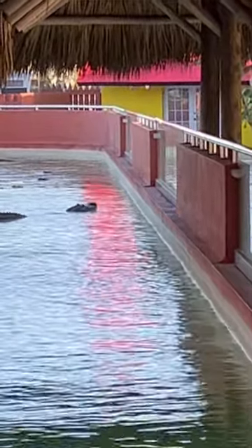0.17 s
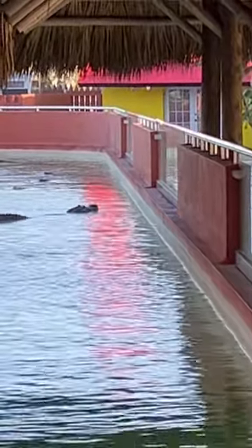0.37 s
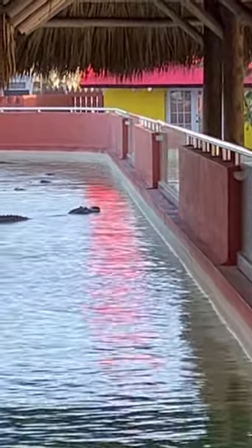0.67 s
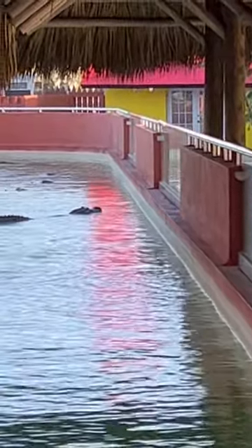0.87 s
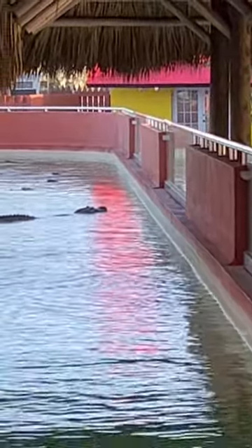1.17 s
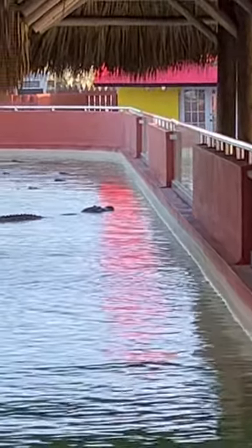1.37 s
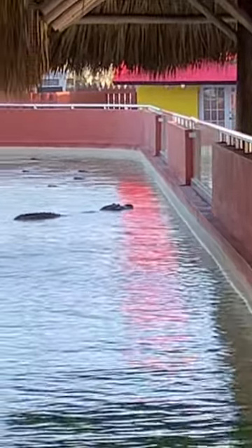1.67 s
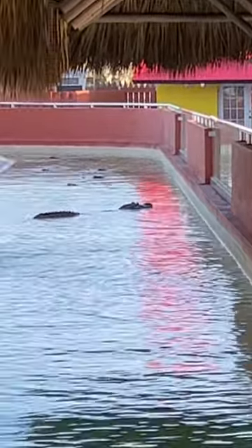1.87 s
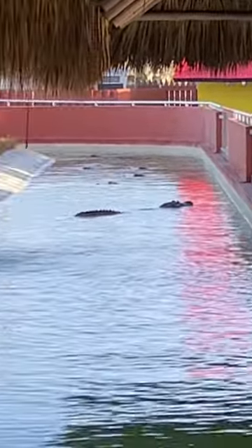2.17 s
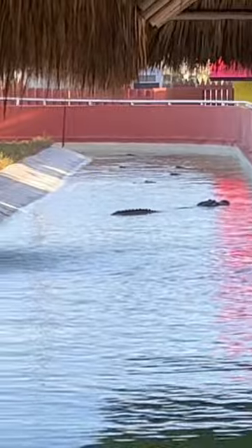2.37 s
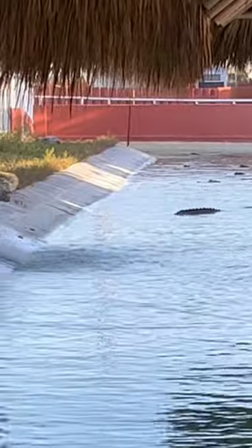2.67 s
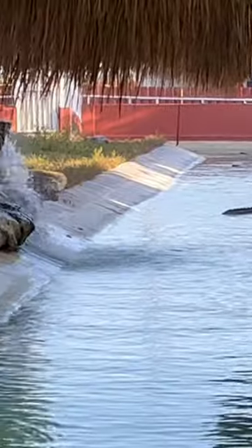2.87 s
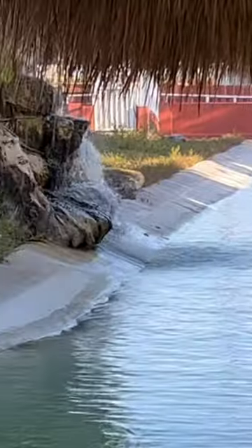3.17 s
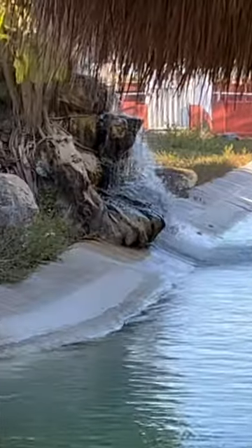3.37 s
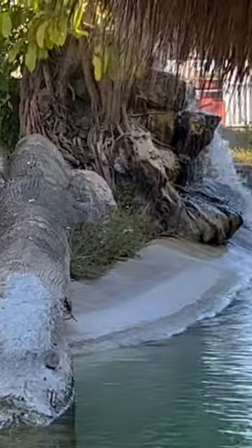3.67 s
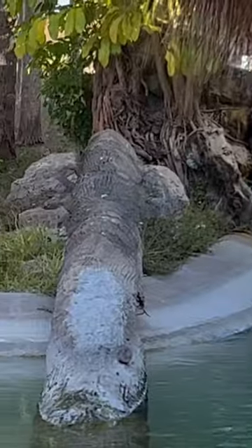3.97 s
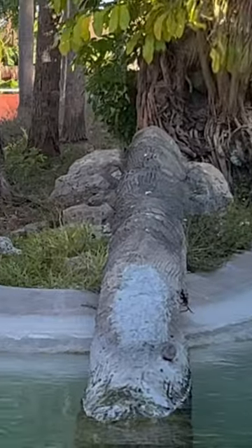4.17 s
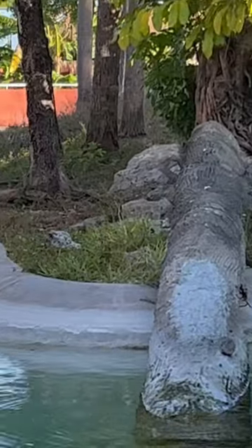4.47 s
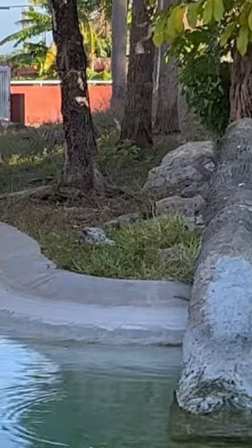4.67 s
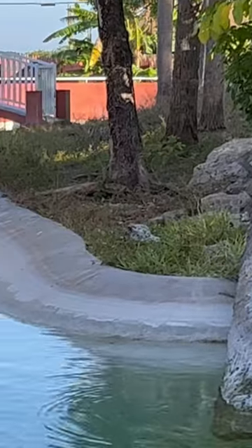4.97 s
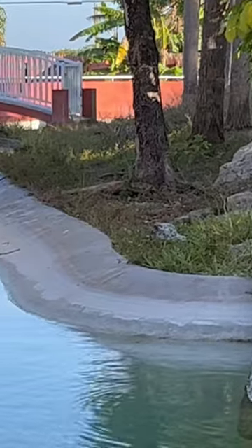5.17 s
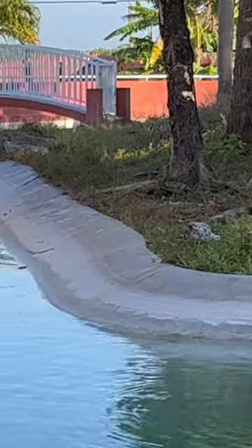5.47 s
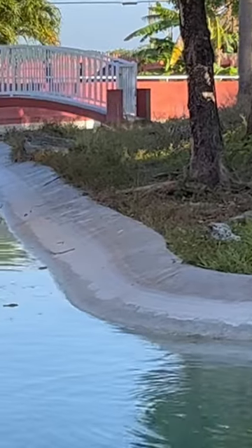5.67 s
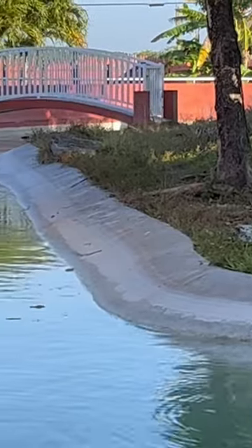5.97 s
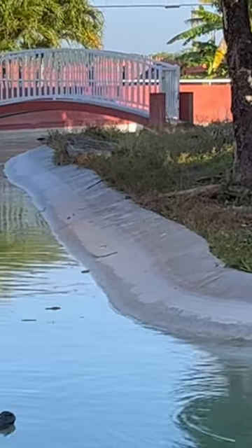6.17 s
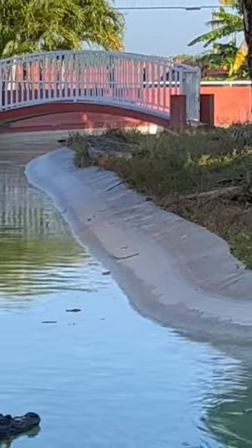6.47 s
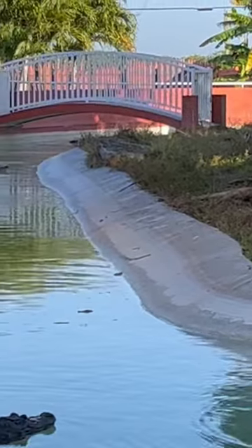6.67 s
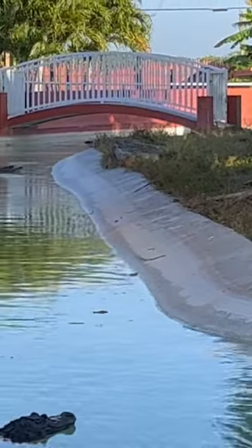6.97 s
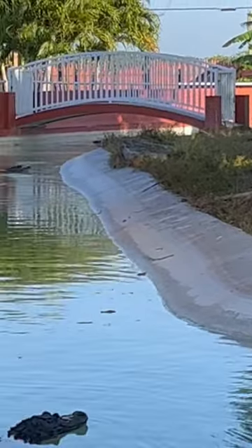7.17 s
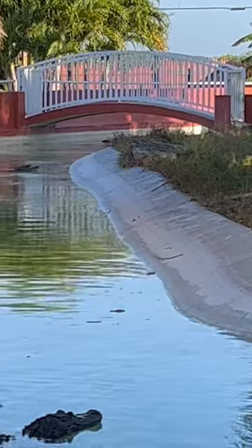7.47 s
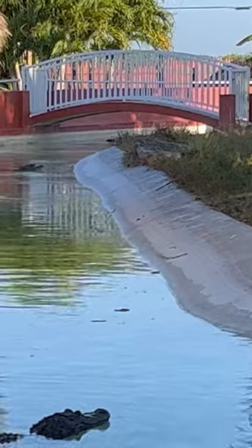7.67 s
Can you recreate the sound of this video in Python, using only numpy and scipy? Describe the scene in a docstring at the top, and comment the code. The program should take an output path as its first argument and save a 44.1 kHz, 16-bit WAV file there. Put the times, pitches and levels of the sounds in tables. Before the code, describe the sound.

Steady, uneven splashing of a little rock waterfall fills the foreground in wide stereo, dotted with sharp drips and soft low gulps. One rough, deep reptile bellow comes early, under a second long. Behind it lie a pump's hum, a far engine that later sinks and throttles back, and low outdoor rumble. Two quick falling bird chirps come near the end. Open air, with only a thin, short echo from the pool walls.

```python
"""A small rock waterfall splashes steadily into an outdoor alligator pool: showers of damped bubble rings
on noise, coloured by hollows in the rocks. One alligator gives a low, rough bellow, a wavering harmonic
series with a band of noise. A distant engine drones on multiples of its cycle rate, sinks in pitch and
throttles back; a pump hums on two sines. Drops and low gulps ring as decaying sines, a bird chirps
twice near the end in downward sweeps, and filtered noise makes a low outdoor rumble."""
import sys
import numpy as np
from scipy import signal
from scipy.fft import rfft, irfft, next_fast_len
from scipy.io import wavfile
from scipy.ndimage import map_coordinates

SR = 44100
rng = np.random.default_rng(int(sys.argv[2]) if len(sys.argv) > 2 else 0)


def int16_out(signal):
    """Quantize to a 16-bit WAV file."""
    q = np.round(np.clip(np.atleast_2d(signal).T, -1, 1) * 32767)
    wavfile.write(sys.argv[1], SR, q.astype(np.int16))


N = 345303


def amp(db):
    """Level is logarithmic: 20 dB is a tenfold amplitude."""
    return 10 ** (np.asarray(db) / 20)


def unit(x):
    """Normalisation by root-mean-square amplitude: the result has rms 1."""
    return x / np.sqrt(np.mean(x ** 2) + 1e-20)


def along(points, hz):
    """Linear interpolation of (frequency [Hz], value) points on a logarithmic frequency axis."""
    f, v = np.transpose(points)
    return np.interp(np.log(hz + 1), np.log(f), v)


def curves(rows):
    """Linear interpolation in time: one value per sample for each column after the time."""
    s, *cols = np.transpose(rows)
    return [np.interp(np.arange(N) / SR, s, c) for c in cols]


def wobble(rate):
    """Band-limited random fluctuation: a spline through random knots, rate of them a second."""
    knots = rng.standard_normal(int(N * rate / SR) + 4)
    return map_coordinates(knots, [np.arange(N) * rate / SR])


def bumps(rows):
    """Gaussian envelopes: passing level changes from (time [s], length [s], change [dB]) rows."""
    t = np.arange(N) / SR
    return sum(db * np.exp(-(2 * (t - s) / length) ** 2) for s, length, db in rows)


def filtered(x, response):
    """Linear filtering: the spectrum of x times a response of frequency."""
    m = next_fast_len(N + SR // 2)
    return irfft(rfft(x, m) * response(np.fft.rfftfreq(m, 1 / SR)), m)[..., :N]


def tone(hz):
    """Phase is the integral of frequency: a sine of rms 1 that follows a pitch curve."""
    return np.sqrt(2) * np.sin(2 * np.pi * (np.cumsum(hz) / SR + rng.random()))


def add(track, s, sound):
    """Superposition: mix a short sound in at time s."""
    part = track[round(s * SR):][:len(sound)]
    part += sound[:len(part)]


def ports(hz):
    """Interaural-style differences: gain and phase at the left and right microphone port."""
    # left minus right: (frequency [Hz], level [dB])
    level_lean = [(60, 0), (160, -.4), (400, -1), (750, -5), (980, -1), (1400, -5.5), (1900, -4),
                  (2700, -.4), (4000, 0)]
    # phase by which the left leads: (frequency [Hz], phase [rad])
    phase_lead = [(60, -.1), (180, -.38), (450, 0), (680, -.15), (900, 1.4), (1130, .9), (1340, 3.5),
                  (1600, 3.6), (1740, .55), (2600, .18), (5000, 0), (5700, -.9), (6600, -1), (7400, -1.8),
                  (8000, -2.9), (8800, -3.3), (10000, -4.6), (11300, -6.2), (12800, -6.4), (14500, -8.8)]
    half = np.array([[.5], [-.5]])
    return amp(half * along(level_lean, hz)) * np.exp(1j * half * along(phase_lead, hz))


def spread(pair, spectrum):
    """Coherence of a wide source: two unrelated signals are coloured and shared between the ports."""
    # likeness of the two ports: (frequency [Hz], coherence [0-1])
    coherence = [(60, .99), (200, .96), (450, .92), (650, .65), (900, .52), (1250, .3), (1500, .6),
                 (1900, .68), (2600, .95), (4000, .995), (5000, .99), (5700, .83), (7300, .8), (8400, .96),
                 (10000, .8), (11000, .97), (12000, .95), (13800, .62)]

    def shares(hz):
        angle = np.arccos(np.clip(along(coherence, hz), 0, 1)) / 2
        return amp(along(spectrum, hz)) * np.array([np.cos(angle), np.sin(angle)])

    shared, apart = filtered(pair, shares)
    both = filtered(np.array([shared + apart, shared - apart]), ports)
    return both / np.std(both.mean(axis=0))  # the mean of the two ports has rms 1


def bubbles(rate, centre_hz, scatter, cycles, size_db):
    """Bubble resonance: a shower of tiny damped rings rising a little in pitch, a few much larger."""
    count = int(rate * N / SR)
    when, size = rng.random((2, count, 1))
    hz = np.clip(centre_hz * np.exp(scatter * rng.standard_normal((count, 1))), 100, SR / 3)
    k = np.arange(int(1.2 * cycles * SR / centre_hz))
    age = k / SR * hz / cycles  # 1 when the ring has decayed by 60 dB
    level_db = -size_db * np.log(np.maximum(size, .01)) - 60 * age
    rings = amp(level_db) * np.sin(2 * np.pi * cycles * age * (1 + 0.14 * age))
    places = (when * N).astype(int) + k
    return unit(np.bincount(places.ravel(), rings.ravel(), N)[:N])


def shower(wash_db, **grain):
    """Many small events tend to noise: two unrelated bubble showers, each on a noise wash."""
    return np.array([bubbles(**grain), bubbles(**grain)]) + amp(wash_db) * rng.standard_normal((2, N))


def rocks(x):
    """Cavity resonance: hollows among the rocks ring weakly with whatever splashes in them."""
    # resonances: (frequency [Hz], width [Hz], gain [dB])
    hollows = [(1400, 100, 4), (1850, 180, 1.5), (2030, 48, 3), (2427, 105, 5), (2638, 84, 5.5),
               (2990, 110, 4.5), (3240, 93, 3.5), (3764, 88, 4)]

    def resonance(f):
        return amp(sum(db / (1 + (2 * (f - hz) / width) ** 2) for hz, width, db in hollows))

    return filtered(x, resonance)


def waterfall():
    """Impact and bubble noise: uneven spurts give splash, ringing trickle, fine spray and low gurgle."""
    # filter shapes: (frequency [Hz], relative gain [dB])
    splash_shape, fizz_shape, gurgle_shape = [(500, -19), (950, -9.5), (1150, -4), (1400, -1.5),
                                              (1680, -3.5), (1900, -2.5), (2600, -1.5), (3300, .5),
                                              (4200, -.3), (5200, -1), (7000, -4.3), (9000, -7.8),
                                              (14000, -17)], [(4000, -20), (7000, -4), (8500, -2),
                                                              (11000, 0), (15000, -3)], [(150, -2), (240, -7.5),
                                                                            (315, 2), (380, -2.5),
                                                                            (450, 1.5), (540, -2),
                                                                            (660, -0.5), (800, -2),
                                                                            (1000, -9), (1600, -42)]
    # base levels of the splash and of the gurgle of larger air pockets: (time [s], level [dB])
    splash_level, gurgle_level = [(0, -43.5), (1, -42.5), (2, -42.5), (3, -42.5), (4.9, -42.5), (6, -42.5),
                                  (7.83, -42.5)], [(0, -54), (1.4, -53.5), (3, -54), (4.1, -54.5),
                                                        (4.8, -55), (5.15, -53.5), (5.55, -57.5), (6, -54),
                                                        (6.9, -55.5), (7.45, -56.5), (7.83, -53)]
    # the fall spurts and slackens: (time [s], length [s], change [dB])
    spurt_times = [(.48, 0.15, -1), (1.03, 0.098, -2.2), (1.22, .08, 1.5), (1.39, 0.081, -2),
                   (2.31, 0.15, -1), (2.46, 0.16, 0.9), (2.72, .07, 0.7), (2.97, 0.052, 1.7),
                   (3.275, 0.038, 1.8), (3.72, .09, -1), (3.84, 0.093, 2), (3.99, 0.054, 0),
                   (4.34, 0.08, -1.5), (4.88, 0.14, -1.5), (5.43, .14, 1), (6.17, 0.041, -3.5),
                   (6.85, .2, 1.2), (7.3, .05, 1.3), (7.46, 0.077, -2.8), (7.56, 0.094, 2),
                   (7.67, 0.17, 0.9)]
    fizz_rel_db = -16.5  # relative to the splash, before its fluctuation

    spurt = unit(wobble(35) + wobble(90))
    surge_db = bumps(spurt_times)
    splash_db, = curves(splash_level)
    gurgle_db, = curves(gurgle_level)

    splatter = shower(wash_db=4.3, rate=1800, centre_hz=2900, scatter=.55, cycles=7, size_db=2.35)
    trickle = shower(wash_db=-20, rate=160, centre_hz=2200, scatter=.45, cycles=60, size_db=2.5)
    spray = shower(wash_db=6.0, rate=3100, centre_hz=10200, scatter=0.1, cycles=9.3, size_db=2.3)
    pockets = shower(wash_db=11.5, rate=140, centre_hz=494.0, scatter=0.395, cycles=36.0, size_db=0.5)

    splash = spread(rocks(splatter + amp(-6.5) * trickle), splash_shape)
    fizz = spread(spray, fizz_shape)
    gurgle = spread(pockets, gurgle_shape)

    splash_gain = amp(surge_db + 0.84 * spurt)
    fizz_gain = amp(fizz_rel_db + 0.48 * surge_db + .45 * spurt + 1.0 * wobble(36))
    return amp(splash_db) * (splash_gain * splash + fizz_gain * fizz) + amp(gurgle_db) * gurgle


def alligator():
    """Vocal-fold harmonics: an unsteady pitch arches past the engine's third order, where the two beat."""
    # partials of the voice: (multiple of the pitch, relative level [dB])
    throat = [(1, -5), (2, -2.5), (2.5, -20), (3, -23), (4, -28)]
    # effort of one push of air, strongest near its start and its end: (time [s], level [dB])
    effort = [(.76, -70), (.805, -39), (.85, -34.5), (.9, -36.5), (.97, -40.5), (1.12, -38.5),
              (1.29, -38.5), (1.36, -34.5), (1.41, -35.5), (1.45, -48), (1.5, -70)]
    # filter shape of the rough noise: (frequency [Hz], relative gain [dB])
    rasp_shape = [(40, -27), (75, 4), (170, 8), (260, -19), (600, -56)]
    start_s, length_s = .78, .68
    rest_hz, arch_hz = 71.7, 8.9  # mean pitch at rest, and its rise at the top of the arch
    throb_hz, throb_rms_db = 13.5, 3  # mean throb rate, and its rms swing at the top of the arch

    t = np.arange(N) / SR - start_s
    arch = np.sin(np.pi * np.clip(t / length_s, 0, 1)).clip(0) ** 0.8
    pitch_hz = (rest_hz + arch_hz * arch) * (1 + .006 * wobble(35))
    voice = sum(amp(level + 0.84 * wobble(24.8)) * tone(k * pitch_hz) for k, level in throat)
    rasp = unit(filtered(rng.standard_normal(N), lambda hz: amp(along(rasp_shape, hz))))

    effort_db, = curves(effort)
    push = amp(effort_db) - amp(effort_db.min())  # exactly silent outside the call
    throb_db = throb_rms_db * arch * (tone(throb_hz + wobble(8.2)) - .5)
    return push * amp(throb_db) * (voice + amp(-16) * rasp)


def engine():
    """Periodic firing gives orders of the cycle rate, each wavering in the air; slower means duller."""
    # sinking slowly and then throttling back: (time [s], mean cycle rate [Hz])
    speed = [(0, 24.55), (1.2, 24.55), (2.4, 24.3), (4.4, 24.15), (5, 23.8), (6.55, 23.5), (7.05, 20.4),
             (7.83, 19.5)]
    # base loudness: (time [s], level [dB])
    loudness = [(0, -50.5), (1.1, -46), (2.3, -46.3), (4.4, -48.3), (4.7, -55), (5.1, -51), (6.5, -48.5),
                (6.85, -50), (7.2, -48), (7.83, -47)]
    # balance of the orders: (order, relative level before the turn [dB], and after it [dB])
    orders = [(3, -11.5, -3), (4, -12, -6.5), (5, -12.5, 0), (6, -0.5, -7), (7, -12, -32), (8, -11.5, -5),
              (9, -16, -7.5)]
    turn_s, turn_length_s = 4.54, 0.22  # middle and length of the change in tone
    dull_per_order_db = 2.6  # lost by each higher order at the slowest speed

    cycle_hz, = curves(speed)
    db, = curves(loudness)
    turned = np.clip(.5 + (np.arange(N) / SR - turn_s) / turn_length_s, 0, 1)
    slowness = (cycle_hz.max() - cycle_hz) / np.ptp(cycle_hz)
    dull_db = dull_per_order_db * slowness ** 2
    cycle_hz = cycle_hz * (1 + 0.0028 * wobble(7))
    lowest = orders[0][0]

    drone = np.zeros(N)
    for k, before, after in orders:
        order_db = db + before + (after - before) * turned - dull_db * (k - lowest)
        waver_db = 1.04 * wobble(3.1) + 0.54 * wobble(15)
        drone += amp(order_db + waver_db) * tone(k * cycle_hz)
    return drone


def pump():
    """Tonal machine noise: a steady hum and a faint whine, both wavering slightly."""
    hum = amp(-49.3 + 1.4 * wobble(2.88)) * tone(59.1 + 0.13 * wobble(2.9))
    whine = amp(-71 + 3 * wobble(4)) * tone(646 + 4 * wobble(12))
    return hum + whine


def drops():
    """Impact and bubble resonance: a drop ticks on the surface, rings an air bubble, scatters spray."""
    # drop rings, a few rows being further rings of the same drop: (time [s], ring level [dB], ring frequency
    # [Hz], 60 dB decay time [s])
    drop_rings = [(.5565, -35, 3570, .01), (1.2217, -28, 2930, .014), (1.2945, -30.5, 2750, .012),
                  (1.963, -30, 2600, .013), (2.022, -27, 3400, .005), (2.023, -25, 5550, .008),
                  (2.0235, -36, 1150, 0.049), (2.301, -40, 1120, 0.059), (2.431, -34, 1450, .016),
                  (2.4982, -34, 2520, .012), (2.961, -38, 2340, 0.0087), (3.0115, -30, 3000, .01),
                  (3.03, -26, 2700, .011), (3.4615, -33, 2570, .012), (3.796, -35, 2400, .014),
                  (3.962, -28, 3120, 0.015), (4.071, -32, 2500, .016), (4.7202, -33, 2560, .012),
                  (4.9452, -31, 2760, 0.018), (5.4044, -27, 2580, .016), (6.002, -33, 2440, .012),
                  (6.2267, -28, 2950, .014), (6.914, -38, 1990, 0.012), (7.365, -28.5, 2030, .023),
                  (7.377, -34, 1540, .035), (7.507, -32, 3030, 0.014), (7.532, -28, 2690, 0.013),
                  (7.7283, -26.5, 1380, 0.023), (7.729, -29, 1850, .018), (7.731, -32, 2500, .016),
                  (7.754, -33, 1880, 0.028), (7.767, -39, 1400, .03)]
    tick_db, tick_t60_s = -6, 0.0049  # levels relative to the ring
    spray_db, spray_t60_s = -13, .04

    track, t = np.zeros(N), np.arange(SR // 6) / SR
    splat = amp(tick_db - 60 * t / tick_t60_s) + amp(spray_db - 60 * t / spray_t60_s)
    for s, db, hz, t60 in drop_rings:
        ring = amp(-60 * t / t60) * np.sin(2 * np.pi * hz * t)
        add(track, s, amp(db) * (ring + splat * rng.standard_normal(len(t))))
    # band from about 900 to 6200 Hz
    return filtered(track, lambda hz: 1 / (1 + (hz / 6200) ** 6) / (1 + (900 / (hz + 1)) ** 6))


def gulps():
    """Large bubbles resonate low: lapping water traps air pockets, which ring with a soft start."""
    # gulps: (time [s], level before the soft start [dB], ring frequency [Hz], 60 dB decay time [s])
    gulp_rings = [(2.455, -34.5, 516, 0.045), (2.461, -42, 330, .06), (2.5, -39, 430, 0.07),
                  (2.524, -33, 690, 0.036), (2.527, -31, 558, 0.044), (2.56, -39, 476, .1),
                  (3.403, -36, 490, 0.043), (3.972, -42, 517, .06), (4.267, -42, 467, 0.066),
                  (4.994, -38, 317, 0.15), (5.03, -42, 420, .08), (5.111, -43, 487, 0.087),
                  (5.25, -36, 321, 0.085), (5.254, -39, 405, 0.057), (5.31, -41, 340, 0.11),
                  (5.89, -44, 460, 0.21), (6.09, -40, 670, .06), (6.204, -40, 470, 0.085),
                  (6.915, -35.5, 452, 0.045), (7.759, -42, 420, .05), (7.774, -42, 380, .05)]
    attack_s = 0.002  # time constant

    track, t = np.zeros(N), np.arange(SR // 4) / SR
    for s, db, hz, t60 in gulp_rings:
        envelope = amp(db - 60 * t / t60) * (1 - np.exp(-t / attack_s))
        add(track, s, envelope * np.sin(2 * np.pi * hz * t))
    return track


def bird():
    """Frequency and amplitude modulation: fluttering whistles sweep down ever faster, rasp and fade."""
    # chirps: (time [s], length [s], mean start pitch [Hz], mean end pitch [Hz], level before fade [dB])
    chirp_rows = [(6.584, .066, 4050, 2350, -31.3), (7.324, .058, 4300, 2300, -37.3)]
    fade_db = 7  # lost over a chirp
    rasp_depth, rasp_hz = .38, 450  # amplitude modulation, and its bandwidth

    track = np.zeros(N)
    for s, length, start_hz, end_hz, db in chirp_rows:
        u = np.linspace(0, 1, int(length * SR))
        hoarse = 1 + .029 * wobble(900)[:len(u)]
        hz = (start_hz + (end_hz - start_hz) * u ** 1.4) * hoarse
        envelope = amp(db - fade_db * u) * np.abs(np.sin(np.pi * u)) ** .6
        add(track, s, envelope * np.sin(2 * np.pi * np.cumsum(hz) / SR))
    flutter = amp(2 * wobble(200))
    return track * flutter * (1 + rasp_depth * wobble(2 * rasp_hz))


def rumble():
    """Broadband noise: the low, shifting murmur of air and far traffic, swelling now and then."""
    # filter shape: (frequency [Hz], relative gain [dB])
    rumble_shape = [(20, -36), (35, -20), (48, -9), (60, -3.5), (74, 1), (88, -4), (105, -2.5),
                    (150, -12.5), (210, -10), (260, -16), (330, -17.5), (600, -59)]
    # brief swells: (time [s], length [s], rise [dB])
    swells = [(2.55, .24, 1.7), (3.44, 0.15, 4), (4.2, 0.58, 1.7), (4.41, 0.087, 6.6)]
    level_db = -47 + bumps(swells) + 0.68 * wobble(10)
    return amp(level_db) * spread(rng.standard_normal((2, N)), rumble_shape)


def walls(x, t60, wet_db):
    """Reverberation: the pool's concrete walls add a thin, short echo, a decaying noise tail."""
    t = np.arange(SR // 2) / SR
    tail = rng.standard_normal((2, len(t))) * amp(-60 * t / t60) * (t > .006)  # 6 ms of delay
    echo = signal.fftconvolve(x[None], tail / np.linalg.norm(tail[0]), axes=1)[:, :N]
    return x + amp(wet_db) * echo


def scene():
    """Superposition of all sources around the pool; the low ones pass the two microphone ports."""
    low = filtered(alligator() + engine() + pump(), ports)
    near = walls(drops() + gulps() + bird(), t60=0.051, wet_db=-15.0)
    return waterfall() + low + near + rumble()


def record(dry):
    """Band limitation: nothing passes at or above 14550 Hz."""
    return filtered(dry, lambda hz: hz < 14550)


dry = scene()
out = record(dry)
int16_out(out)
```